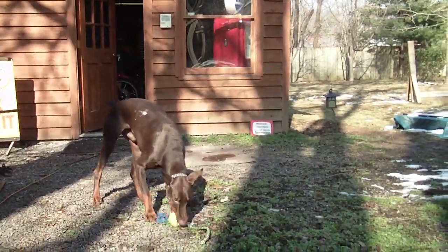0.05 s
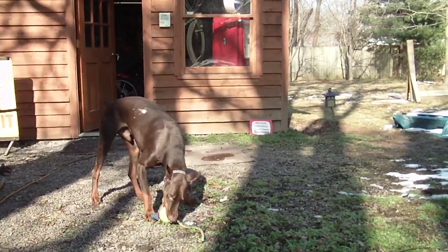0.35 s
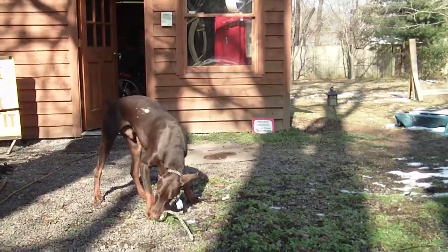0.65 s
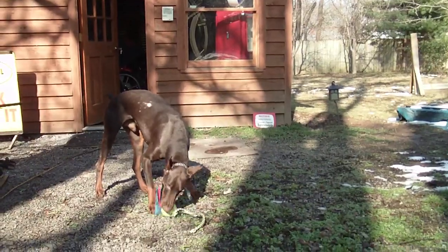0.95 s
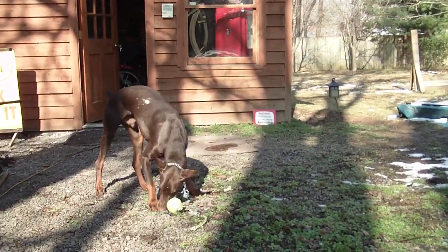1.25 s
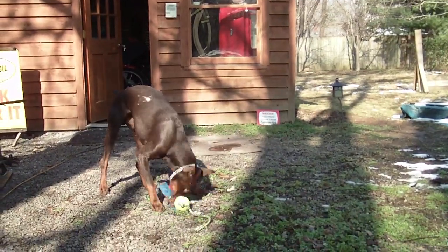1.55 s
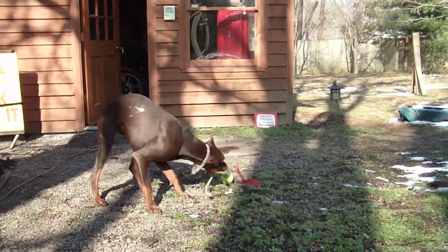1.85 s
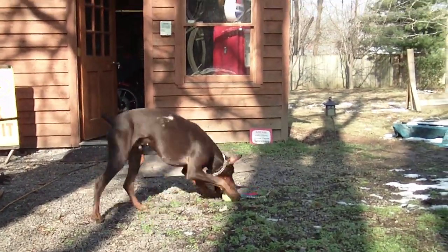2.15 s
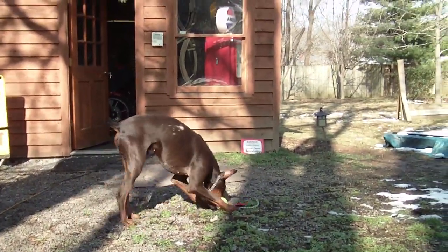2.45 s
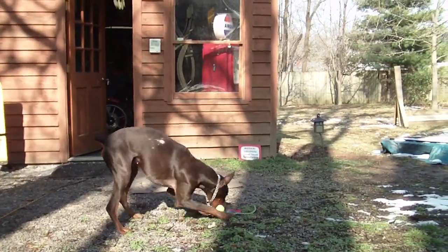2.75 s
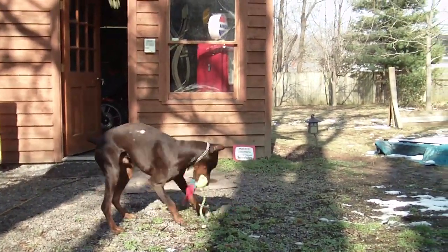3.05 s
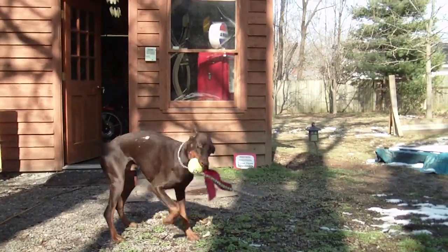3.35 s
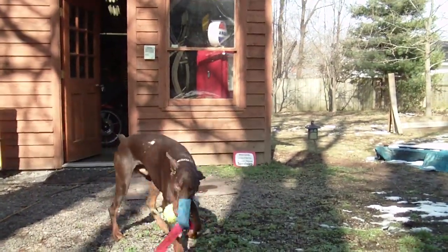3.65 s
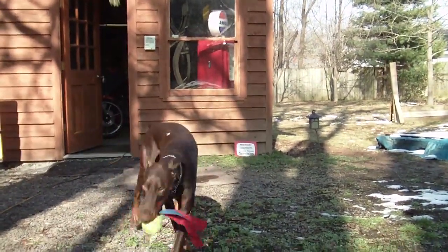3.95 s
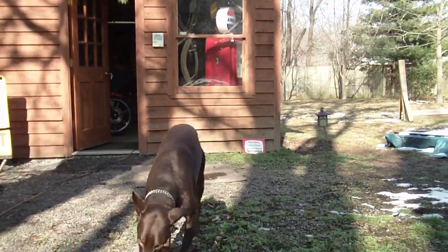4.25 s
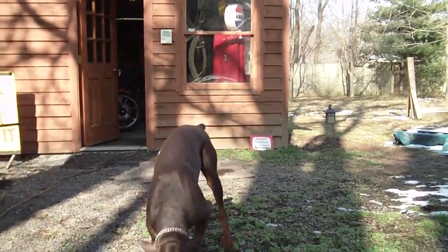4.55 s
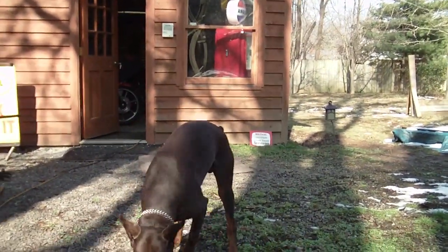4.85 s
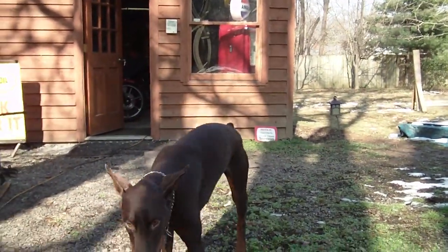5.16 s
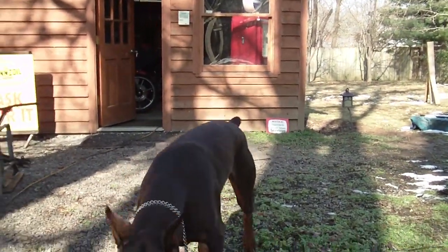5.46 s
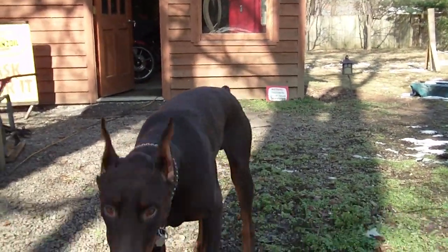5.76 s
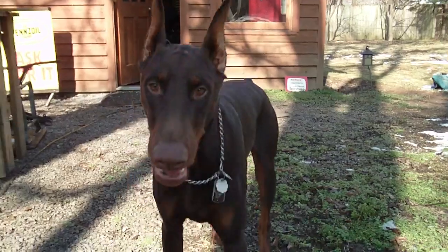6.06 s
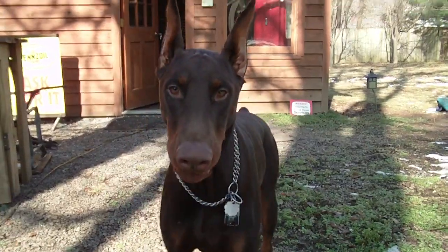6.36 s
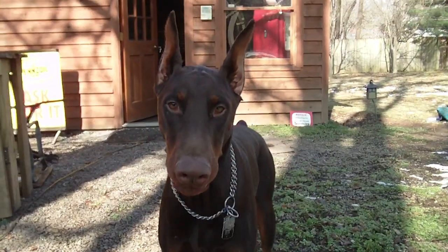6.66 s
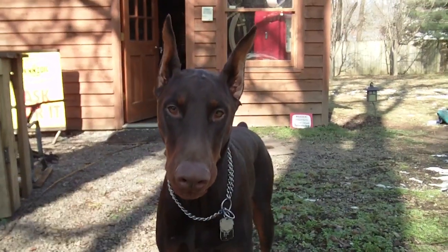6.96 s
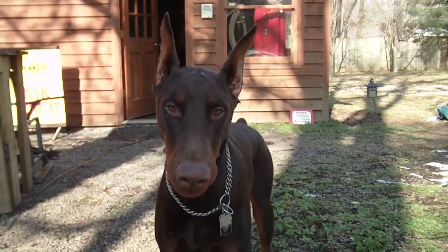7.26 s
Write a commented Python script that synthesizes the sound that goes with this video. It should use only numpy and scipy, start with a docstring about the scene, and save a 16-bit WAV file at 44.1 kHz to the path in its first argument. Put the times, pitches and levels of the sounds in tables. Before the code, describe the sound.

A big dog plays with a rope ball in a yard. Its steel chain collar rattles and clinks brightly against a tag, while paws scuff and crunch on gravel and the toy knocks on the ground. The jingling grows busy, peaks about halfway, then thins out and stops. A songbird whistles early on, others call far off, and a breeze rumbles low on the microphone.

```python
"""A big dog tugs a rope ball over gravel and grass in a yard, over a low rumble of breeze. Mono.
From the start to 3 s a songbird whistles in the trees; others call farther off throughout.
From 0.3 s the dog's steel chain collar rattles, then knocks its end ring and flat tag; paws scuff
and the toy thuds. The tugging is busiest from 2 s to the hardest chain strike at 3.6 s.
From 4.9 s the faintly whining camera ticks. Air puffs at the microphone near 6 s; the chain rests at 7 s."""
import sys
import numpy as np
from scipy import signal
from scipy.fft import rfft, irfft, next_fast_len
from scipy.io import wavfile
from scipy.ndimage import uniform_filter1d, minimum_filter1d, map_coordinates

SR = 44100
rng = np.random.default_rng(int(sys.argv[2]) if len(sys.argv) > 2 else 0)


def digitize_waveform(pressure):
    """Quantize a signal to 16-bit integers and store it at the path in sys.argv[1].

    Rows of a 2-D input are taken as channels; values are limited to [-1, 1].
    """
    field = np.atleast_2d(pressure).T
    bounded = np.clip(field, -1, 1)
    quanta = np.round(bounded * 32767).astype(np.int16)
    wavfile.write(sys.argv[1], SR, quanta)


N = 331180

# Levels are relative within each table.
# breeze at the microphone: time_s, level_db
BREEZE_LEVEL = [(0, -38.5), (1.2, -39.5), (1.7, -41.5), (2.7, -39.5), (3.9, -43.5), (4.7, -39), (7.5, -39)]
# gusts: centre_s, length_s, level_db
GUSTS = [(0.395, .14, -29), (0.666, 0.076, -30.5), (1.172, .2, -35), (4.547, 0.2, -34), (4.745, .1, -38),
         (5.305, 0.043, -32), (5.958, 0.59, -38.5), (6.746, 0.061, -36.5), (7.116, 0.1, -34),
         (7.366, .08, -44)]
# wind rumble: freq_hz, density_db
RUMBLE_SPECTRUM = [(12, -23.5), (20, 3), (47, 2.5), (86, 0.5), (128, -3.5), (167, -14), (260, -29.5),
                   (340, -75), (570, -120)]
# air puffs: start_s, level_db
PUFFS = [(5.883, -22), (5.994, -26), (6.05, -23.5), (6.109, -25), (6.148, -23)]
# distant wind and roads: time_s, level_db
MURMUR_LEVEL = [(0.0, -51), (0.83, -54), (0.94, -55.5), (1.96, -57), (2.28, -52.5), (3.01, -54.5),
                (3.24, -57.5), (4.22, -59), (4.58, -55.5), (5.45, -59.5), (7.04, -61.5), (7.5, -61)]
# distant wind and roads: freq_hz, density_db
MURMUR_SPECTRUM = [(100, 2), (220, 5.5), (400, 0), (800, 0), (1500, -8.5), (3000, -13), (6000, -18.5),
                   (15000, -30)]
# lens ticks: start_s, level_db
TICKS = [(4.8624, -47.5), (4.995, -46), (5.1957, -48.5), (5.3953, -50.5), (5.95, -53), (6.263, -48),
         (6.398, -50), (6.764, -50), (7.0973, -48.5), (7.2302, -53), (7.3644, -48)]
# lens mechanism: freq_hz, level_db, t60_s
TICK_MODES = [(2430, 1, 0.026), (5280, -1.5, .012)]

# rising song notes: start_s, end_hz, level_db
WHISTLES = [(-.11, 2157, -51), (.223, 2100, -51.5), (.56, 2070, -52.5), (.879, 2120, -51),
            (1.204, 2080, -53), (1.53, 2003, -55), (1.881, 1895, -57.5), (2.171, 1860, -53.5),
            (2.45, 1853, -57), (2.733, 1820, -64), (3.031, 1826, -59)]
# falling song notes: start_s, start_hz, level_db
SLURS = [(.039, 4390, -49.5), (.388, 4180, -53), (.728, 4360, -50), (1.055, 4340, -49), (1.39, 4180, -51),
         (1.74, 4050, -54.5), (2.545, 4020, -55.5), (2.857, 3920, -56), (3.126, 4040, -53.5)]
# distant birds: start_s, length_s, start_hz, end_hz, level_db
FAR_CALLS = [(.46, 0.12, 4620, 4730, -69), (.56, 0.18, 5780, 5900, -68), (.867, 0.15, 2990, 3490, -59),
             (3.945, 0.071, 3400, 3960, -66), (4.11, 0.042, 3560, 3900, -64),
             (4.261, 0.095, 3300, 2630, -58.5), (5.211, .2, 3550, 2700, -64.5),
             (6.093, .085, 4020, 3220, -67), (6.495, 0.091, 3030, 3310, -65),
             (7.118, .1, 3710, 2950, -70.5)]
# returns off shed and fence: delay_s, level_db
WALL_ECHOES = [(.021, -1.5), (.072, -13)]
# scatter from near trees, far trees, shed: freq_hz, t60_s
TREE_DECAY = [(200, 0.32), (2000, 0.45), (4000, 0.61), (10000, 0.18)]
FAR_DECAY = [(1000, .35), (6000, .293)]
SHED_DECAY = [(500, .25), (7000, .2), (14000, .12)]

# paw and rope scrapes: start_s, length_s, level_db
SCUFFS = [(-.05, 1, -55), (0.466, 0.11, -82), (1.58, 0.32, -49), (1.86, 0.43, -46.5), (2.132, 0.4, -40),
          (2.545, 0.17, -45), (2.79, 0.55, -44), (3.34, 0.43, -50), (3.674, 0.31, -54.5), (4.44, 0.22, -46),
          (4.682, 0.98, -58.5), (5.623, 0.32, -51.5), (6.007, 0.2, -56.5)]
# gravel and twig cracks, hard chain clacks: start_s, level_db
CRUNCHES = [(0.788, -35), (1.3172, -23), (1.756, -30.5), (1.867, -31), (2.0365, -25.5), (2.263, -41),
            (2.3138, -25), (2.3484, -29.5), (3.044, -24), (3.2029, -13), (3.464, -29.5), (3.6098, -21.5),
            (4.563, -30), (4.7483, -29), (5.243, -31), (5.3602, -31), (5.4964, -37.5), (5.654, -39.5),
            (6.0313, -36), (6.2298, -22), (6.562, -31.5), (6.661, -36), (7.0131, -34.5)]
# paw and toy blows: start_s, level_db, thud_db
KNOCKS = [(0.505, -25, -29), (0.608, -31, 12), (0.957, -46, -16), (1.74, -27.5, -25), (2.038, -25.5, -17),
          (2.619, -26.5, -13), (3.36, -16.5, -32), (3.612, -20, -31.5), (4.838, -28, -4)]
# toy body: freq_hz, base_width_hz, level_db
TOY_MODES = [(397, 24, -5), (940, 49, 1), (2090, 73, 0), (2590, 23, -11.5), (2870, 16, -5.5)]
# ground contacts: freq_hz, density_db
GRAVEL_SPECTRUM = [(300, -8.5), (900, -11), (2200, 2), (5000, -1.5), (9000, 8.5), (13000, -6.5),
                   (16000, -16)]
CRACK_SPECTRUM = [(800, -19.5), (2000, -10), (3000, -1.5), (5500, -4.5), (8500, 7), (12000, -3),
                  (15500, -21)]
GRIT_SPECTRUM = [(200, -19), (900, 5.5), (1300, 12.5), (2200, -8), (4000, -13), (9000, -45)]
THUD_SPECTRUM = [(80, -5.5), (350, 0), (700, -8), (2000, -47)]

# chain motion: time_s, level_db
CHAIN_ACTIVITY = [(0.0, -54), (1.02, -59.5), (1.69, -49), (1.77, -40.5), (2.28, -39), (2.67, -47),
                  (3.07, -39), (3.41, -40.5), (3.84, -47), (4.22, -48), (4.34, -51), (4.72, -43),
                  (4.89, -53.5), (5.62, -64.5), (5.87, -52), (6.52, -62.5), (6.77, -79.5), (7.5, -89)]
# chiming links: freq_hz, level_db, free_t60_s, free_db
LINK_MODES = [(2525, -28, .05, -12), (6630, -17, .05, -16), (7210, 1, .085, -17), (9572, -3, .09, -15),
              (9810, -1, .07, -17), (10890, 0, .1, -10), (12230, -14, .09, -11), (15130, -5, .08, -12)]
# chime balance when sliding: freq_hz, gain_db
SLIDE_TILT = [(7000, -4), (9800, -2.5), (10900, -8.5)]
# link clicks, sliding and struck: freq_hz, density_db
SLIDE_SPECTRUM = [(2940, -68.5), (5000, -9), (6290, -8.5), (7030, 2.5), (8790, -7.5), (9650, -6),
                  (10200, -13.5), (10400, -10), (11300, -8), (11700, -26), (12500, -28), (14000, -28),
                  (14700, -32), (15500, -9.5), (16000, -26)]
CLICK_SPECTRUM = [(1000, -65), (2500, -31), (4000, -22), (5500, -18), (6300, -9), (6900, -4), (7600, -5),
                  (8500, 1.5), (9600, 5), (10300, -10.5), (12500, -18), (15000, -14.5), (15800, -15)]
# chain strikes: start_s, level_db, rattle_s, low_chime_db, click_db
STRIKES = [(0.2806, -30, 0.0035, -4, -2.5), (0.3193, -36, 0.00098, -11, 6.5),
           (0.3766, -33.5, .0017, -3, -2.5), (0.719, -25.5, 0.0021, 1, 9.5), (0.8303, -14, 0.0024, 3, -5),
           (0.8484, -27, 0.0085, 4, 7.5), (1.0684, -30, 0.0061, 2.5, -2), (1.1204, -24.5, .004, -48, -11),
           (1.3007, -30, 0.009, -27, 6), (1.3172, -18.5, 0.0074, 7, -1), (1.3426, -29, .0045, 12, -1),
           (1.418, -21.5, .005, -6, -8), (1.4284, -14, 0.0049, -35, -17), (1.444, -18.5, .0043, -10, -6.5),
           (1.4537, -22.5, 0.0047, -2, -13), (1.646, -28, 0.0087, -25, 4),
           (1.8337, -32.5, 0.0017, -18, -21.5), (1.881, -28.5, 0.0045, -22, 8.5),
           (1.9358, -30, 0.0066, -6, -2), (2.0393, -11.5, 0.0096, -2.5, -6),
           (2.0584, -13, 0.0089, -13, -2.5), (2.0722, -15.5, 0.0031, -1.5, -1.5),
           (2.0813, -15, 0.0068, -13, -19.5), (2.1616, -22.5, 0.0062, -2, -6.5),
           (2.1863, -26, 0.017, -9, -22.5), (2.218, -29, .003, -10, -1.5), (2.3316, -23, 0.0039, -7, 1.5),
           (2.3877, -18, 0.0059, 3, -3), (2.4048, -17, 0.0098, -10, 2), (2.4249, -18.5, 0.012, -15, -16.5),
           (2.586, -22.5, .012, -14, -1), (2.6538, -27, 0.0047, -37, -23), (2.8977, -28, 0.0056, -3, -18.5),
           (2.9875, -18.5, 0.0052, -13, -16), (3.0061, -18.5, 0.009, -17, -16),
           (3.1356, -27.5, .004, 16, 12), (3.2021, -20.5, 0.0092, 4.5, 1.5), (3.2354, -21, 0.0044, 0, -3.5),
           (3.3027, -32, 0.00075, -7, -21), (3.5403, -26, .003, 3, 2.5), (3.5635, -22.5, 0.0076, -14, -17),
           (3.5718, -23.5, 0.0041, -10, -8.5), (3.61, -4.5, 0.0021, 3, 2), (3.977, -33, 0.0041, -30, -25),
           (3.9997, -30, 0.0049, -26, 0), (4.041, -30, .012, 6, -9), (4.103, -29, 0.0093, -22, -2),
           (4.1642, -29, 0.0081, -10, 2.5), (4.1921, -25.5, 0.0034, -8, -8.5),
           (4.265, -27.5, 0.0033, -30, -1.5), (4.3202, -27, 0.0042, -5, 7.5),
           (4.477, -27.5, 0.0029, -20, 2), (4.5384, -31, .0055, 3, 2), (4.5895, -26.5, 0.013, -0.5, -7),
           (4.6675, -29, 0.0035, -18, -5), (4.7484, -13, 0.0063, -2.5, -2.5),
           (4.7896, -27.5, 0.0062, -6, -12), (4.832, -23.5, 0.0047, -13, -1),
           (5.155, -20, 0.0046, -0.5, -5.5), (5.2445, -34, .0026, 11, 14), (5.4107, -26, 0.0019, -11, -4),
           (5.6978, -26, 0.0095, -19, 0.5), (5.712, -19, 0.006, 0, -12.5), (5.767, -27, 0.0015, 5.5, -8),
           (5.8797, -37, 0.00397, -4.5, 3), (5.9488, -24.5, .0055, -41, -19.5),
           (5.9643, -32.5, 0.00413, -6, -5), (6.0193, -21.5, 0.0025, -10, -3),
           (6.0315, -16, 0.0025, -6.5, -1.5), (6.1094, -27.5, 0.0022, -2, 7.5),
           (6.2309, -14, 0.0038, 1.5, 4.5), (6.2525, -35, 0.0035, -11, -6),
           (6.421, -10, 0.0047, -11.5, -10.5), (6.4993, -33.5, .0017, 17, 6), (6.5637, -30, 0.0018, 7, -3),
           (6.5805, -33.5, 0.0025, 0, -8), (6.661, -34.5, 0.0021, -1.5, -15), (6.836, -53, .002, -3, -6),
           (7.0131, -29.5, 0.0023, -6, -6), (7.0237, -30, 0.0016, -14, 6)]
# hanging tag and end ring: freq_hz, level_db, t60_s
TAG_MODES = [(6037, 0, .13), (6125, -7, .3), (13325, -10, .25)]
END_RING_MODES = [(2525, -1, .11), (2620, -3, .06), (6630, 6, .11), (12230, -6, .1)]
# blows on tag and end ring: start_s, level_db
TAG_HITS = [(1.0674, -49), (1.3175, -36.5), (1.4186, -38), (2.0392, -43), (2.0823, -34.5), (2.1854, -38),
            (2.3883, -33), (2.4066, -29.5), (2.5955, -46), (2.8975, -39), (2.9875, -35), (3.1351, -40),
            (3.202, -38), (3.5403, -47), (3.6112, -49), (4, -49), (4.1043, -44), (4.3215, -47),
            (4.5912, -41), (4.667, -34.5), (4.7477, -32.5), (5.1585, -39), (5.691, -37.5), (6.0188, -49),
            (6.23, -45), (6.4209, -55), (6.5638, -43.5), (6.6613, -47.5), (7.013, -46)]
END_RING_HITS = [(.8488, -51.5), (1.0682, -65), (1.3166, -42), (2.039, -30.5), (2.072, -30), (2.148, -49),
                 (2.3153, -40.5), (2.4052, -35.5), (2.5955, -48), (2.8487, -50), (2.8977, -42),
                 (2.9248, -34), (2.9875, -46), (3.048, -51), (3.1351, -48), (3.326, -42.5), (3.6118, -41),
                 (4.0853, -48), (4.5386, -51), (4.7492, -40), (5.2449, -54), (6.2328, -58.5),
                 (6.5646, -48.5)]


def amp(db):
    """Decibels to gain."""
    return 10 ** (np.asarray(db) / 20)


def unit(x):
    """Scale to rms 1."""
    return x / np.sqrt(np.mean(x ** 2) + 1e-20)


def burst(x):
    """Scale to the energy of 10 ms at rms 1."""
    return x * np.sqrt(SR / 100 / (np.sum(x ** 2) + 1e-20))


def along(points, hz):
    """Read (freq_hz, value) points on a log axis."""
    freqs_hz, values = np.transpose(points)
    return np.interp(np.log(hz + 1), np.log(freqs_hz + 1), values)


def curve(points):
    """Read (time_s, value) points at every sample."""
    return np.interp(np.arange(N) / SR, *np.transpose(points))


def wobble(rate_hz, size):
    """Smooth random curve, rate_hz knots a second."""
    knots = rng.standard_normal(int(size * rate_hz / SR) + 4)
    return map_coordinates(knots, [np.arange(size) * rate_hz / SR])


def swell(length_s, rise):
    """Smooth rise and fall; rise is the share spent rising."""
    u = np.linspace(0, 1, int(length_s * SR))
    return np.sin(np.pi * np.interp(u, [0, rise, 1], [0, .5, 1]))


def coloured(x, spectrum):
    """Minimum-phase filter shaped by (freq_hz, gain_db) points."""
    m = 2 * next_fast_len(len(x) // 2 + 2048)
    gain = amp(along(spectrum, np.fft.rfftfreq(m, 1 / SR)))
    cepstrum = irfft(np.log(gain + 1e-6), m)
    cepstrum[1:m // 2] *= 2
    cepstrum[m // 2 + 1:] = 0
    return irfft(rfft(x, m) * np.exp(rfft(cepstrum)), m)[:len(x)]


def add(track, start_s, sound):
    """Mix a sound into the track."""
    i = round(start_s * SR)
    part = sound[max(-i, 0):max(len(track) - i, 0)]
    track[max(i, 0):max(i, 0) + len(part)] += part


def grains(rate_hz, spread_db, size):
    """Random tiny contacts of uneven strength."""
    impulses = (rng.random(size) < rate_hz / SR) * rng.choice([-1, 1], size)
    return impulses * amp(spread_db * np.clip(rng.standard_normal(size), -2, 2))


def tails(contacts, tau_s):
    """Envelope with an exponential tail on each contact."""
    return signal.lfilter([1], [1, -np.exp(-1 / (tau_s * SR))], abs(contacts))


def noise_hit(t, t60_s):
    """Decaying white noise."""
    return rng.standard_normal(len(t)) * amp(-60 * t / t60_s)


def scatter(x, decay):
    """Diffuse reflections after 10 ms; each frequency dies at its own rate."""
    hz, t, spectra = signal.stft(rng.standard_normal(SR // 2), SR, nperseg=256)
    tail = signal.istft(spectra * amp(-60 * t / along(decay, hz)[:, None]), SR, nperseg=256)[1]
    tail = np.pad(tail, (SR // 100, 0))
    return signal.fftconvolve(x, tail / np.linalg.norm(tail))[:N]


def murmur():
    """Drifting wash of distant wind and roads."""
    level_db = curve(MURMUR_LEVEL) + 5 + wobble(rate_hz=7, size=N)
    return amp(level_db) * unit(coloured(rng.standard_normal(N), MURMUR_SPECTRUM))


def breeze():
    """Air on the microphone: gusting rumble and single pressure puffs."""
    strength = amp(curve(BREEZE_LEVEL) + wobble(rate_hz=11, size=N))
    for centre_s, length_s, db in GUSTS:
        add(strength, centre_s - length_s / 2, amp(db - 5.5) * swell(length_s, rise=.45))
    out = strength * unit(coloured(rng.standard_normal(N), RUMBLE_SPECTRUM))
    u = np.arange(SR // 16) / SR / .0053 - 1.6
    puff = (2 * u ** 2 - 1) * np.exp(-u ** 2) * (1 - np.exp(-3 * (u - u[0])))
    for start_s, db in PUFFS:
        add(out, start_s, amp(db) * puff)
    return out


def camera():
    """Lens mechanism ticks, each between two fainter ones; thin whine and hiss."""
    out, t = np.zeros(N), np.arange(SR // 16) / SR
    attack = 1 - np.exp(-t / .00077)
    for start_s, db in TICKS:
        before_s, after_s = rng.uniform(-.07, -.01), rng.uniform(.01, .07)
        for offset_s, gain_db in (0, 0), (before_s, -11), (after_s, -11):
            ring = sum(amp(mode_db + rng.normal(0, 2) - 60 * t / t60_s)
                       * np.sin(2 * np.pi * hz * rng.normal(1, .015) * t)
                       for hz, mode_db, t60_s in TICK_MODES)
            add(out, start_s + offset_s, amp(db + gain_db + 9.5) * ring * attack)
    whine_hz = 12050 + 25 * wobble(rate_hz=60, size=N)
    whine = np.sin(2 * np.pi * np.cumsum(whine_hz) / SR)
    return out + amp(-78) * whine + amp(-81) * rng.standard_normal(N)


def bird_note(length_s, start_hz, end_hz, waver):
    """Whistled glide, fastest at first; waver is a share of its pitch span."""
    u = np.linspace(0, 1, int(length_s * SR))
    glide = u ** .75 + waver * wobble(rate_hz=240, size=len(u))
    pitch_hz = start_hz + (end_hz - start_hz) * glide
    return abs(np.sin(np.pi * u)) ** .5 * np.sin(2 * np.pi * np.cumsum(pitch_hz) / SR)


def birds():
    """One bird alternates rising and falling notes; distant ones arrive only scattered by trees."""
    song, far = np.zeros(N), np.zeros(N)
    whistle_s, slur_s = .145, .072
    for start_s, end_hz, db in WHISTLES:
        add(song, start_s, amp(db) * bird_note(whistle_s, .89 * end_hz, end_hz, waver=.096))
    for start_s, start_hz, db in SLURS:
        add(song, start_s, amp(db) * bird_note(slur_s, start_hz, .72 * start_hz, waver=.035))
    for start_s, length_s, start_hz, end_hz, db in FAR_CALLS:
        add(far, start_s, amp(db) * bird_note(length_s, start_hz, end_hz, waver=.17))
    out = amp(-.5) * song + scatter(song, TREE_DECAY) + amp(7) * scatter(far, FAR_DECAY)
    for delay_s, db in WALL_ECHOES:
        add(out, delay_s, amp(db) * song)
    return out


def scuffs(rest_db=-74):
    """Paws and rope shift small stones and dry grass, which settle in between."""
    stones = tails(grains(rate_hz=220, spread_db=7.5, size=N), tau_s=.001)
    pressure = np.full(N, amp(rest_db))
    for start_s, length_s, db in SCUFFS:
        add(pressure, start_s, amp(db) * swell(length_s, rise=.22))
    return pressure * unit(coloured((stones + .25) * rng.standard_normal(N), GRAVEL_SPECTRUM))


def crunches():
    """Single cracks of gravel and twigs, hard clacks of the chain."""
    out, t = np.zeros(N), np.arange(SR // 20) / SR
    for start_s, db in CRUNCHES:
        add(out, start_s, amp(db - 10) * burst(coloured(noise_hit(t, t60_s=.042), CRACK_SPECTRUM)))
    return out


def knocks(extra_width_hz=70):
    """Paws and toy hit the ground: damped body modes, grit and a thud."""
    out, t = np.zeros(N), np.arange(SR // 8) / SR
    for start_s, db, thud_db in KNOCKS:
        body = sum(amp(mode_db) * np.exp(-np.pi * (width_hz + extra_width_hz) * t)
                   * np.sin(2 * np.pi * hz * rng.normal(1, .18) * t)
                   for hz, width_hz, mode_db in TOY_MODES)
        grit = coloured(noise_hit(t, t60_s=.028), GRIT_SPECTRUM)
        thud = coloured(noise_hit(t, t60_s=.053), THUD_SPECTRUM)
        knock = 2.05 * burst(body) + burst(grit) + amp(thud_db + 5.5) * burst(thud)
        add(out, start_s, amp(db - 26) * knock)
    return out


def sliding_chain():
    """Links slide over each other with small clicks and damped chimes."""
    t = np.arange(SR // 8) / SR
    touches = grains(rate_hz=110, spread_db=6.5, size=N)
    chime = sum(amp(db + along(SLIDE_TILT, hz) - 60 * t / (.5 * t60_s)) * np.sin(2 * np.pi * hz * t)
                for hz, db, t60_s, _ in LINK_MODES)
    chimes = unit(signal.fftconvolve(touches, chime)[:N])
    clicks = unit(coloured(rng.standard_normal(N) * tails(touches, tau_s=.0012), SLIDE_SPECTRUM))
    level_db = curve(CHAIN_ACTIVITY) - 1.5 + 3 * wobble(rate_hz=14, size=N)
    return amp(level_db) * (amp(-2) * chimes + amp(-7) * clicks)


def link_strike(rattle_s, low_db, high_db, click_db):
    """Blow and rebounds: links click and chime, are choked by their neighbours, ring on faintly."""
    t = np.arange(SR // 5) / SR
    rattle_s = max(rattle_s, 1e-3)
    rebounds = .5 * grains(rate_hz=800, spread_db=7.5, size=len(t))
    rebounds *= np.exp(-(t / (2 * rattle_s)) ** .79)
    rebounds[0] = 1
    click = noise_hit(t, t60_s=.008)
    click[0] += 4
    clicks = coloured(signal.fftconvolve(rebounds, click)[:len(t)], CLICK_SPECTRUM)
    out = amp(click_db + 1) * burst(clicks)
    tilt = [(6600, 0), (7100, low_db), (7400, low_db), (9300, 0), (10100, 0), (10600, high_db)]
    choked = np.exp(-(t / (1.6 * rattle_s)) ** 1.34)
    attack = (1 - .5 * np.exp(-t / (.4 * rattle_s))) * (1 - np.exp(-t / .0002))
    for hz, db, t60_s, free_db in LINK_MODES:
        phase = 2 * np.pi * (hz * t + rng.random())
        phase += .47 * np.cumsum(rebounds * rng.standard_normal(len(t)))  # each rebound nudges it
        envelope = (choked + amp(free_db - 5.5 - 60 * t / t60_s)) * attack
        out += amp(db + along(tilt, hz) + rng.normal(0, 1.17)) * burst(envelope * np.sin(phase))
    return burst(out)


def stray_clinks(rate_hz=11, max_db=-34):
    """Loose links tap at random, as hard as the chain is moving."""
    out, activity_db = np.zeros(N), curve(CHAIN_ACTIVITY)
    for slot in range(int(rate_hz * N / SR)):
        start_s = (slot + rng.random()) / rate_hz
        force_db, low_db, click_db = rng.normal(5.5, 1), rng.normal(-11, 4), rng.normal(1, 6)
        db = min(activity_db[int(start_s * SR)] + force_db, max_db)
        clink = link_strike(rattle_s=.0041, low_db=low_db, high_db=-10, click_db=click_db)
        add(out, start_s, amp(db) * clink)
    return out


def free_ring(modes):
    """A free-hanging piece rings longer; how it hangs shifts pitch and damping each time."""
    t = np.arange(SR // 3) / SR
    detune, damping = rng.normal(1, .0017), amp(rng.normal(0, 2))
    swing_rad = .6 * wobble(rate_hz=80, size=len(t))
    ring = sum(amp(db + rng.normal(0, 2) - 60 * damping * t / t60_s)
               * np.sin(2 * np.pi * (hz * detune * t + rng.random()) + swing_rad)
               for hz, db, t60_s in modes)
    return ring * (1 - np.exp(-t / .00058))


def collar(lead_db=-24.5, lead_rattle_s=.002):
    """Neck moves swing the chain against tag and end ring; a light touch leads as slack is taken up."""
    out = np.zeros(N)
    for start_s, db, rattle_s, low_db, click_db in STRIKES:
        high_db = -10.5 + .21 * low_db
        lead_s = rng.uniform(.0025, .0075)
        touch = link_strike(lead_rattle_s, low_db, high_db, click_db)
        add(out, start_s - lead_s, amp(db + lead_db) * touch)
        add(out, start_s, amp(db) * link_strike(rattle_s, low_db, high_db, click_db))
    for start_s, db in TAG_HITS:
        add(out, start_s, amp(db) * free_ring(TAG_MODES))
    for start_s, db in END_RING_HITS:
        add(out, start_s, amp(db) * free_ring(END_RING_MODES))
    return out


def scene():
    """The dog in the yard, before a faintly reflecting wooden shed."""
    dog = collar() + stray_clinks() + sliding_chain() + scuffs() + crunches() + knocks()
    shed = amp(-31) * scatter(dog, SHED_DECAY)
    mono = dog + shed + birds() + breeze() + murmur() + camera()
    return np.array([mono, mono])


def record(dry):
    """Fast limiter at full scale, then a brick-wall low-pass."""
    cutoff_hz = 15700
    needed_gain = 1 / np.maximum(abs(dry[0]), 1)
    gain = uniform_filter1d(minimum_filter1d(needed_gain, size=131), size=129)
    m = next_fast_len(N + SR // 2)
    passband = np.fft.rfftfreq(m, 1 / SR) < cutoff_hz
    return irfft(rfft(dry * gain, m) * passband, m)[:, :N]


dry = scene()
out = record(dry)
digitize_waveform(out)
```